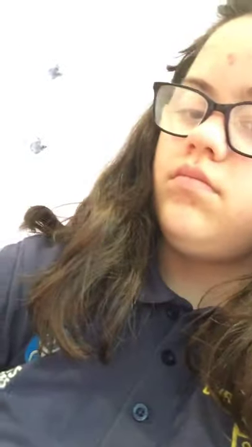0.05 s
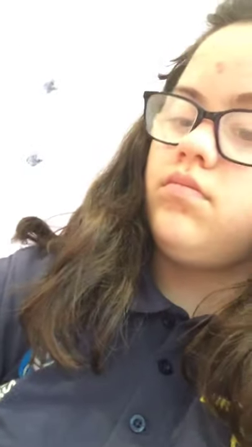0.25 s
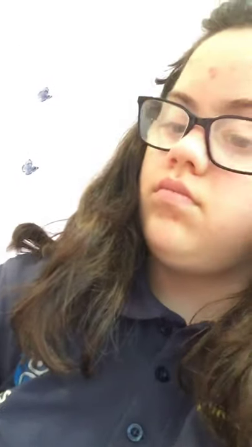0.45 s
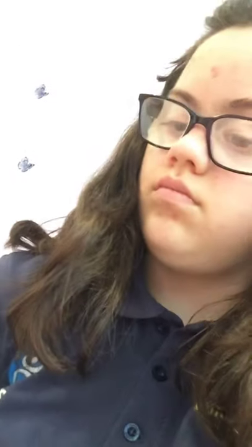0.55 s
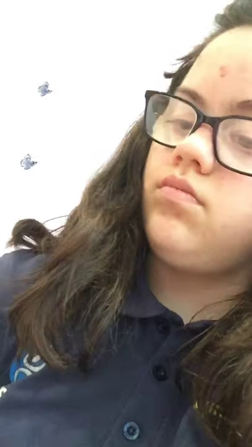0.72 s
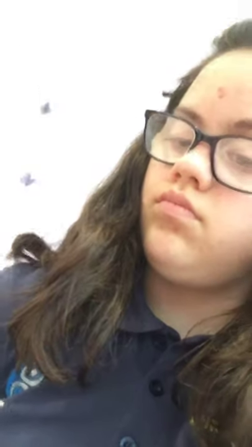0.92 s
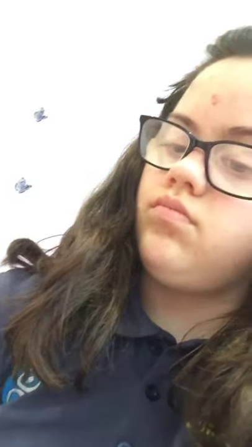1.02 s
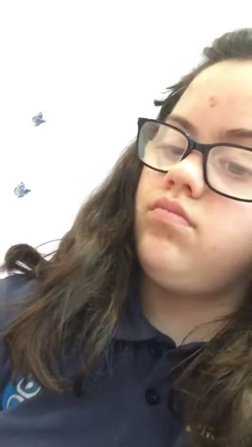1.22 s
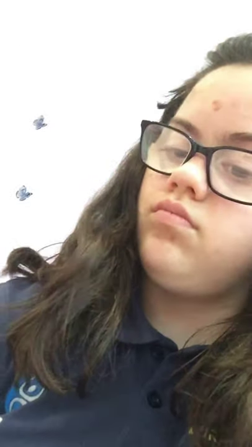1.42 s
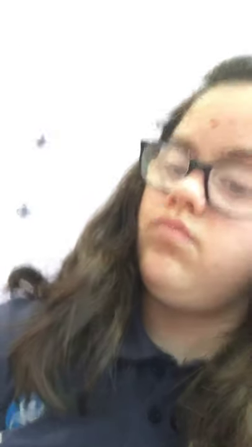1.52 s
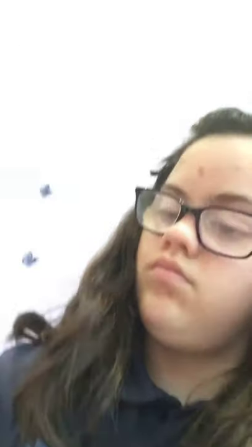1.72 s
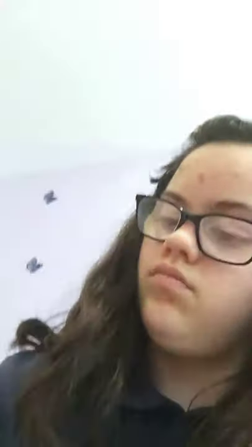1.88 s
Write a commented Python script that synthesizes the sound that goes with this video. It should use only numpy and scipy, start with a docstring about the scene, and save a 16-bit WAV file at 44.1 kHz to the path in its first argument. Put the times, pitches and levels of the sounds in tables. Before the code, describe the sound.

Plastic pens and pencils are rummaged in a pencil case, close to the microphone in a small room. A sharp click rings briefly, then comes a burst of clatter and lighter taps and scrapes, over a faint low rumble.

```python
"""Plastic pens and pencils are rummaged in a pencil case, close by in a small, echoing room.
Their barrels rub, tap, scrape and click together in clusters. The case booms when bumped,
a hollow wall rings when a pen drops on it, and a metal clip and tip ring on after sharp clicks.
Under it all lie a dull room rumble and a faint low tone. A noise suppressor softens quiet hiss."""
import sys
import numpy as np
from scipy import signal
from scipy.fft import rfft, irfft
from scipy.io import wavfile
from scipy.ndimage import uniform_filter1d

SR = 44100
rng = np.random.default_rng(int(sys.argv[2]) if len(sys.argv) > 2 else 0)


def persist_wave(psi):
    """Save psi, clipped to +-1, as 16-bit WAV."""
    counts = np.round(np.clip(psi, -1, 1) * 32767).astype(np.int16)
    wavfile.write(sys.argv[1], SR, np.atleast_2d(counts).T)


N = 85995
TIME = np.arange(N) / SR
CONTACT_MS = np.arange(1024) / SR * 1000  # time within one tap or click


def gain(db):
    """Turn decibels into a number to multiply by."""
    return 10 ** (np.asarray(db) / 20)


def unit(x):
    """Scale a sound to an average (rms) strength of 1."""
    return x / np.sqrt(np.mean(x ** 2))


def add(out, at, x):
    """Mix x in at a time in seconds."""
    i = int(at * SR)
    out[i:i + len(x)] += x[:max(N - i, 0)]


def swell(start, length):
    """A level that rises and falls once, like a push of the hand."""
    return np.sin(np.pi * np.clip((TIME - start) / length, 0, 1))


def bands(x):
    """Split a sound into four bands, low to high: thud, knock, snap and tick."""
    edges_hz = [(480, 2150), (2798, 3623), (4100, 7200), (7700, 15800)]
    return [signal.sosfilt(signal.butter(order, edges, "band", fs=SR, output="sos"), x)
            for order, edges in zip((3, 2, 4, 4), edges_hz)]


def ring(tones, detune=0):
    """A struck object's tones, each falling 60 dB in its fade time; detune shifts them at random."""
    t, out = np.arange(SR // 2) / SR, 0
    for hz, db, fade in tones:
        pitch = hz * (1 + detune * rng.standard_normal())
        out = out + gain(db - 60 * t / fade) * np.sin(2 * np.pi * pitch * t)
    return out


def strikes(hits, tones, detune=0):
    """An object rings each time it is hit."""
    out = np.zeros(N)
    for at, db in hits:
        add(out, at, gain(db) * ring(tones, detune))
    return out


def rattle(top_hz):
    """The random shaking of a loose part, which blurs each tone it rings with."""
    return unit(signal.sosfilt(signal.butter(2, top_hz, fs=SR, output="sos"), rng.standard_normal(N)))


# The rumble's mix of low and high: f/Hz, relative level/dB
RUMBLE_SHAPE = [(30, -36), (65, -17), (100, -15.5), (170, -0.5), (235, 1.5), (330, -5), (470, -20.5),
                (680, -14), (1100, -15.5), (1300, -18.5), (1480, -33.5), (16000, -44)]
# How loud the rumble is: t/s, level/dB
RUMBLE_LEVELS = [(0, -55), (.13, -58), (.45, -62.5), (.78, -63.5), (1.05, -58.5), (1.22, -66), (1.595, -65),
                 (1.61, -98), (1.635, -66.5), (1.72, -59.5), (1.87, -72.5), (1.95, -75)]


def rumble():
    """A dull room rumble wanders in level; a noise suppressor briefly mutes it once."""
    hz, db = np.transpose(RUMBLE_SHAPE)
    shape = gain(np.interp(np.log(np.fft.rfftfreq(N, 1 / SR) + 1), np.log(hz), db))
    noise = unit(irfft(rfft(rng.standard_normal(N)) * shape, N))
    return noise * gain(np.interp(TIME, *np.transpose(RUMBLE_LEVELS)))


# The path of the low tone: t/s, f/Hz, level/dB
TONE_PATH = [(0, 230.2, -56.5), (.22, 200, -68), (.36, 186, -62), (.6, 172, -66), (.8, 180, -77),
             (1.05, 169, -62.5), (1.15, 169, -69.5), (1.25, 172, -100), (1.74, 175, -84.5),
             (1.84, 170, -61.5), (1.95, 170, -95)]


def low_tone(waver_db=6):
    """A faint low tone drifts in pitch and wavers in level."""
    times, hz, db = np.transpose(TONE_PATH)
    waver = np.interp(np.arange(N), np.linspace(0, N, 50), rng.standard_normal(50))
    phase = 2 * np.pi * np.cumsum(np.interp(TIME, times, hz)) / SR
    return np.sqrt(2) * np.sin(phase) * gain(np.interp(TIME, times, db) + waver_db * waver)


# Bumps on the case: t/s, level/dB
CASE_HITS = [(.004, -50), (.06, -47), (.2165, -53.5), (.857, -50.5), (.9907, -44), (1.6812, -52.5),
             (1.699, -59.5)]
# The case's tones: f/Hz, level/dB, fade/s
CASE_TONES = [(124, -13, 0.01), (235.6, 0.5, 0.13), (305, 0.5, 0.12), (354.3, -5.5, 0.12)]


def case_bumps():
    """The bumped case gives a short, low boom, a little different each time."""
    return strikes(CASE_HITS, CASE_TONES, detune=0.016)


# A pen barrel's tones, in slides and clicks: f/Hz, level/dB, fade/s
BARREL_TONES = [(1350, -9.5, .05), (1630, 3, .026), (3016, -5, .09), (3105, -3, .09), (3486, -6, .05),
                (4280, -7.5, .06), (4420, -3, .05), (4755, -3, .06), (4985, 1, .045), (5610, -3, .05),
                (6626, 0, .045)]
# Barrel sliding on barrel: t/s, length/s, then level/dB for thud, knock, snap and tick
BARREL_SLIDES = [(0.005, 0.098, -61, -63, -67, -62), (0.146, 0.071, -63, -59, -58, -64),
                 (0.37, 0.096, -102, -83, -64, -62), (0.497, 0.036, -73, -79.5, -71, -65.5),
                 (0.733, 0.054, -86.5, -83.5, -79.5, -71), (0.794, 0.074, -91.5, -76.5, -70.5, -68),
                 (0.822, 0.062, -55, -59, -54, -62), (0.84, 0.22, -66.5, -64.5, -66.5, -67),
                 (0.984, 0.11, -59, -52.5, -51.5, -54), (1.073, 0.13, -63.5, -58.5, -62, -63.5),
                 (1.245, 0.064, -65, -62.5, -67, -81.5), (1.361, 0.06, -62.5, -70, -65.5, -110),
                 (1.452, 0.054, -67.5, -66.5, -63.5, -68), (1.48, 0.12, -69, -72, -73.5, -84),
                 (1.655, 0.065, -62.5, -59.5, -59, -62)]


def slides(catches_per_s=1500, spread_db=2.5, catch_ms=0.4, smooth_hiss=1.5, ring_amount=0.32):
    """Barrels rub: tiny catches over a smooth hiss set them ringing, swelling with each push."""
    catches = rng.random(N) < catches_per_s / SR
    strength = gain(spread_db * np.minimum(rng.exponential(size=N), 4))
    grit = signal.lfilter([1], [1, -np.exp(-1000 / (catch_ms * SR))], catches * strength)
    friction = unit((unit(grit) + smooth_hiss) * rng.standard_normal(N))
    ringing = unit(signal.fftconvolve(friction, ring(BARREL_TONES))[:N])
    rub = [unit(band) for band in bands(friction + ring_amount * ringing)]
    out = np.zeros(N)
    for at, length, *levels in BARREL_SLIDES:
        out += swell(at, length) * sum(gain(db) * band for db, band in zip(levels, rub))
    return out


# Light taps on a held barrel: t/s, f/Hz, level/dB (as if packed into 1 ms)
BARREL_TAPS = [(.021, 1900, -46), (.186, 4600, -46), (1.3763, 2070, -44.5), (1.4705, 4440, -46.5),
               (1.4774, 4500, -46), (1.522, 3130, -55.5), (1.542, 4330, -57), (1.5548, 2230, -47.5),
               (1.5713, 2130, -44), (1.675, 2500, -42)]


def taps(decay_ms=0.9):
    """A light touch makes a brief, soft chatter around one pitch; the held barrel barely rings."""
    out = np.zeros(N)
    for at, hz, db in BARREL_TAPS:
        chatter = rng.standard_normal(len(CONTACT_MS)) * np.exp(-CONTACT_MS / decay_ms)
        soft = signal.lfilter(*signal.butter(2, 2 * hz, fs=SR), chatter)
        tap = unit(signal.lfilter(*signal.iirpeak(hz, Q=3, fs=SR), soft))
        add(out, at, gain(db) * tap / np.sqrt(CONTACT_MS[-1]))
    return out


# Barrel hitting barrel: t/s, then level/dB for thud, knock, snap and tick, then decay/ms
BARREL_CLICKS = [(0.2165, -32, -26, -17, -20, 0.6), (0.2251, -51, -40, -37, -37, 2),
                 (0.2272, -44, -35, -34, -37, 0.5), (0.829, -52, -60, -43, -44, 0.6),
                 (0.8355, -44, -48, -45, -41, 2), (0.8525, -53, -49, -42, -47, 1),
                 (0.8563, -41, -41, -38, -35, 1.6), (0.8699, -45, -48, -41, -33, 0.8),
                 (0.9127, -52, -39, -48, -54, 1.5), (0.9907, -33, -29, -22, -25, 1.1),
                 (0.9965, -45, -42, -41, -32, 0.5), (1.0035, -42, -34, -29, -26, 1.5),
                 (1.01, -45, -38, -34, -30, 1), (1.0131, -39, -30, -25, -34, 0.5),
                 (1.0148, -44, -34, -28, -34, 0.6), (1.1064, -44, -36, -36, -45, 0.9),
                 (1.1114, -49, -39, -49, -57, 1), (1.1405, -49, -40, -42, -49, 0.6),
                 (1.143, -51, -39, -36, -36, 0.9), (1.1533, -53, -41, -48, -48, 0.9),
                 (1.277, -53, -44, -44, -58, 0.5), (1.3961, -55, -58, -43, -88, 0.5),
                 (1.4943, -51, -53, -49, -53, 0.9), (1.5713, -58, -56, -67, -55, 0.7),
                 (1.6812, -41, -29, -31, -34, 0.7)]


def clicks(contact_db=-1.5, ring_db=-19):
    """Barrels collide: a sharp spike and about a millisecond of chatter, then a brief ring."""
    out, hits = np.zeros(N), []
    spike = unit((CONTACT_MS == 0) * 1.0)
    for at, thud, knock, snap, tick, decay_ms in BARREL_CLICKS:
        chatter = unit(rng.standard_normal(len(CONTACT_MS)) * np.exp(-CONTACT_MS / decay_ms))
        contact = bands(0.43 * chatter + 0.285 * spike)
        click = sum(gain(db) * unit(band) for db, band in zip((thud, knock, snap, tick), contact))
        add(out, at, gain(contact_db) * click / np.sqrt(CONTACT_MS[-1]))
        hits.append((at, (knock + snap) / 2 + ring_db))
    return out + strikes(hits, BARREL_TONES, detune=0.0018)


# The hit on the pocket clip: t/s, level/dB
CLIP_STRIKES = [(.2165, -40)]
CLIP_TONES = [(3321, -14, .28), (4938, -10, .28), (5227, -6, .27), (5287, -3, .3), (5323, -1, .33),
              (5484, -8, .26), (6498, -12, .32), (7693, -9, .3), (10760, -9, .17)]


def pocket_clip():
    """A loose metal pocket clip is struck and rattles as it rings."""
    return strikes(CLIP_STRIKES, CLIP_TONES) * unit(1 + rattle(top_hz=70))


# Pens scraping: t/s, length/s, middle f/Hz, width/Hz, level/dB
PEN_SCRAPES = [(0.382, 0.039, 15400, 1980, -65), (0.404, 0.049, 2910, 300, -76),
               (.477, 0.062, 12300, 2980, -64), (0.552, 0.12, 14200, 1540, -72),
               (0.716, 0.081, 3010, 218.6, -83), (0.728, 0.092, 6580, 700, -76.5),
               (1.267, 0.027, 3200, 500, -59.5), (1.268, .026, 15000, 1610, -63),
               (1.552, 0.057, 2200, 890, -67.5), (1.637, 0.038, 2750, 900, -62.5),
               (1.639, 0.068, 6360, 1110, -56.5)]


def scrapes():
    """A pen drags along a neighbour or the lining and sings in a narrow band of noise."""
    hz, out = np.fft.rfftfreq(N, 1 / SR), np.zeros(N)
    for at, length, middle, width, db in PEN_SCRAPES:
        peak = 1 / (1 + (2 * (hz - middle) / width) ** 2)
        noise = unit(irfft(rfft(rng.standard_normal(N)) * peak, N))
        out += gain(db) * noise * swell(at, length)
    return out


# Hits on the pen tip: t/s, level/dB
TIP_STRIKES = [(.8563, -62), (.8699, -36.5)]
# The tip's tones: f/Hz, level/dB, fade/s
TIP_TONES = [(8050, -16, .2), (11960, -5, 0.05), (14200, -6.5, .09)]


def pen_tip():
    """A small, loose metal tip rings very high; fast rattling blurs its tones."""
    return strikes(TIP_STRIKES, TIP_TONES) * rattle(top_hz=350)


# Hits on the hollow wall: t/s, level/dB
WALL_HITS = [(.8565, -58), (.8685, -45.5), (.9907, -43)]
# The wall's tones: f/Hz, level/dB, fade/s
WALL_TONES = [(616, -1.7, 0.07), (689, 2.04, 0.045)]


def hollow_wall():
    """A pen drops against a hollow wall, which rings with two short tones."""
    return strikes(WALL_HITS, WALL_TONES)


# The room's echoes: f/Hz, level/dB compared with the direct sound, fade/s
ROOM_ECHOES = [(253, -1.5, 0.062), (740, -12.5, 0.31), (2190, -6.5, 0.18), (3000, -12, 0.23),
               (6400, -14, 0.36), (9500, -10, 0.27), (15000, -9.5, 0.075)]


def room(x, delay_s=0.0016, build_s=0.0072):
    """Add dense echoes from the walls, which build up quickly and die away band by band."""
    t = np.arange(SR // 2) / SR
    log_hz = np.log(np.fft.rfftfreq(len(t), 1 / SR) + 1)
    log_middles = np.log([row[0] for row in ROOM_ECHOES])
    build = np.clip((t - delay_s) / build_s, 0, 1)
    noise, echoes = rfft(rng.standard_normal(len(t))), 0
    for (_, db, fade), this_band in zip(ROOM_ECHOES, np.eye(len(ROOM_ECHOES))):
        level = build * gain(-60 * t / fade)
        band = irfft(noise * np.interp(log_hz, log_middles, this_band), len(t))
        echoes = echoes + gain(db) * band * level / np.linalg.norm(level)
    return x + signal.fftconvolve(x, echoes)[:N]


def noise_suppressor(x, quiet_db=-90.5, deepest_cut_db=-6.5, full_above_hz=1600):
    """Turn down each treble band while it is quiet, which shortens the echoes."""
    hz, _, spectrum = signal.stft(x, SR, nperseg=512, noverlap=384)
    power = uniform_filter1d(np.abs(spectrum) ** 2, size=9, axis=-2)  # smooth over pitch
    power = uniform_filter1d(power, size=3, axis=-1).clip(0)  # and over time
    kept = np.maximum(power / (power + gain(quiet_db) ** 2), gain(deepest_cut_db))
    treble = np.clip(2 * hz / full_above_hz - 1, 0, 1)[:, None]
    return signal.istft(spectrum * kept ** treble, SR, nperseg=512, noverlap=384)[1][..., :N]


def scene():
    """Pens and case echo in the room; the small sounds and the background get no echo."""
    pens = clicks() + slides() + case_bumps() + hollow_wall()
    metal = pocket_clip() + pen_tip()
    return (room(pens) + metal + taps() + scrapes() + rumble() + low_tone())[None]


def record(dry, bottom_hz=105, top_hz=16000):
    """The microphone loses the deep bass and the very top; quiet hiss is turned down."""
    bass_cut = signal.butter(5, bottom_hz, "high", fs=SR, output="sos")
    top_cut = signal.ellip(8, 0.2, 70, top_hz, fs=SR, output="sos")
    return signal.sosfilt(top_cut, noise_suppressor(signal.sosfilt(bass_cut, dry)))


dry = scene()
out = record(dry)
persist_wave(out)
```